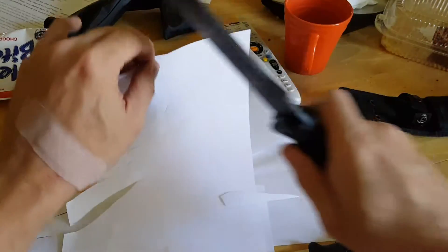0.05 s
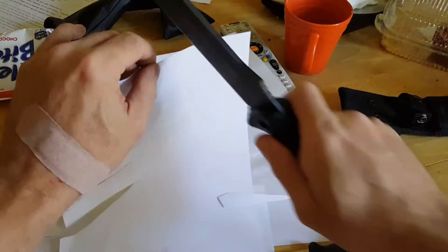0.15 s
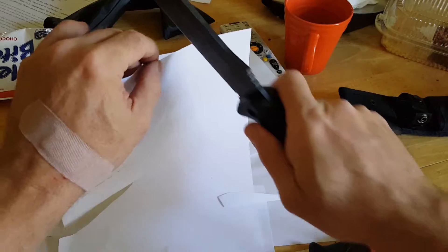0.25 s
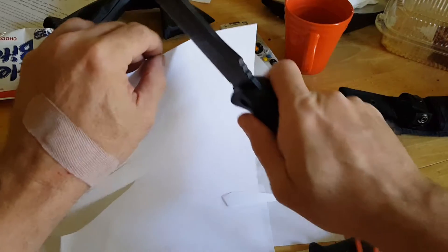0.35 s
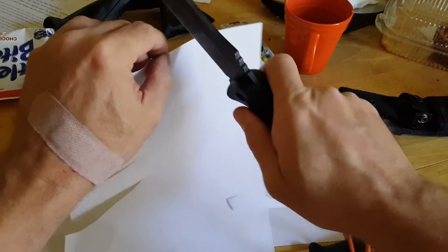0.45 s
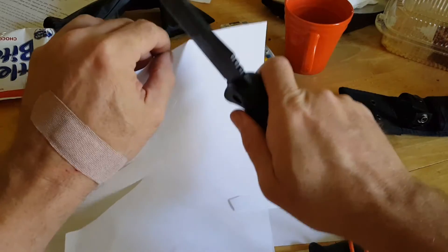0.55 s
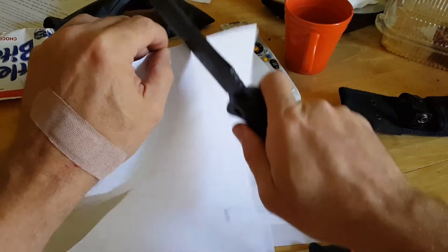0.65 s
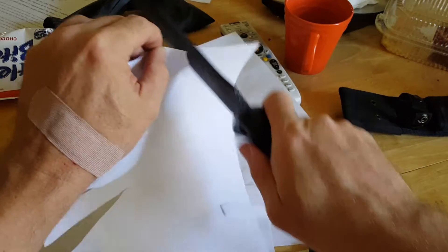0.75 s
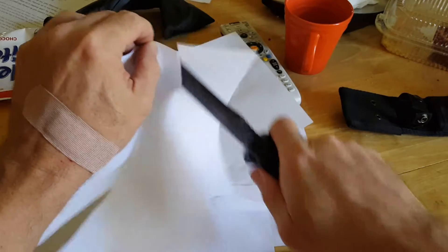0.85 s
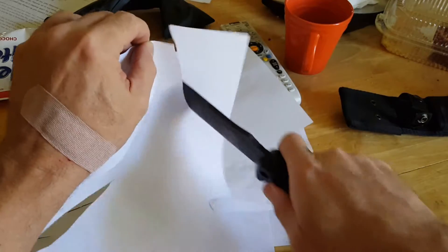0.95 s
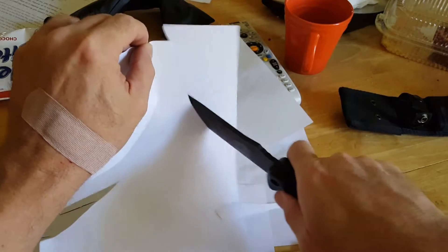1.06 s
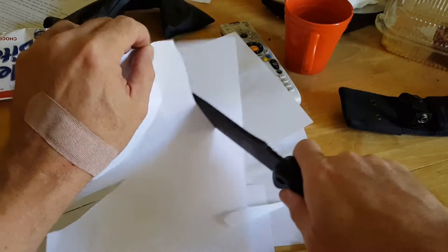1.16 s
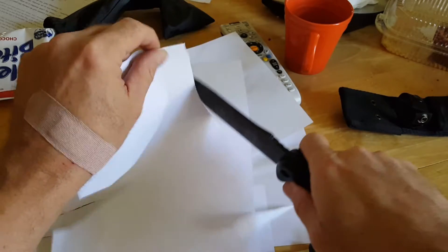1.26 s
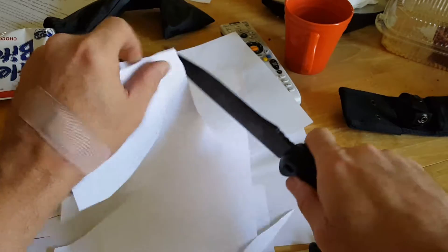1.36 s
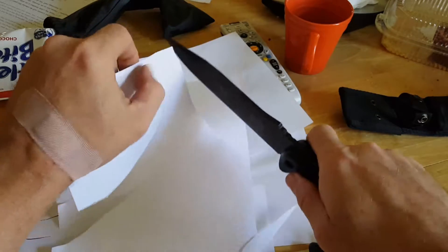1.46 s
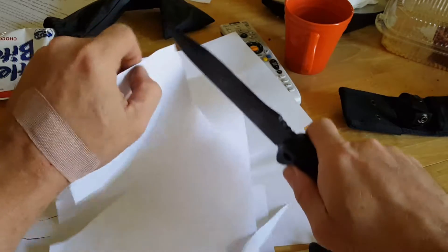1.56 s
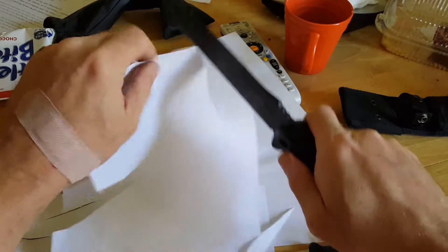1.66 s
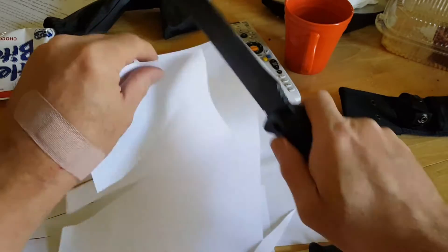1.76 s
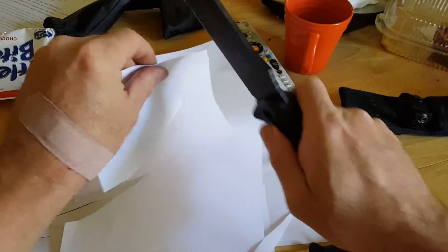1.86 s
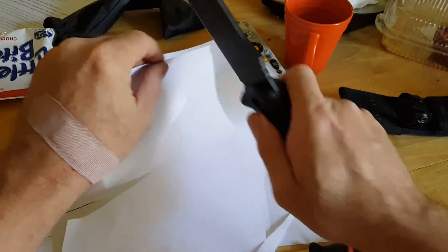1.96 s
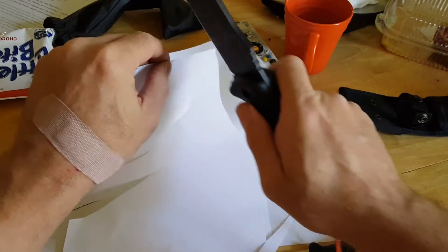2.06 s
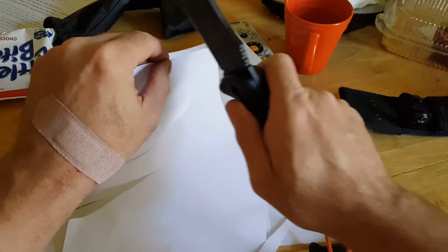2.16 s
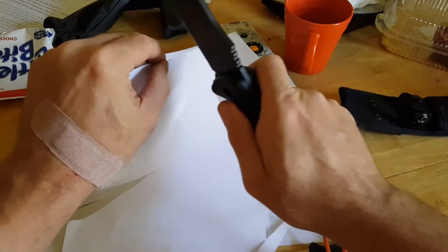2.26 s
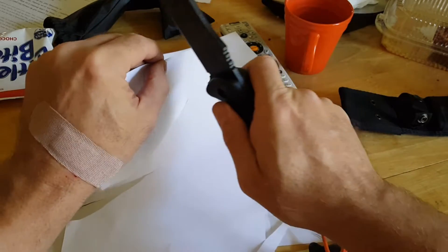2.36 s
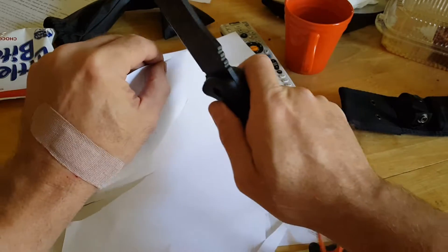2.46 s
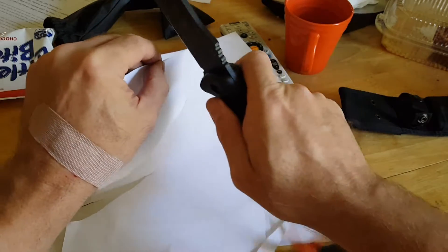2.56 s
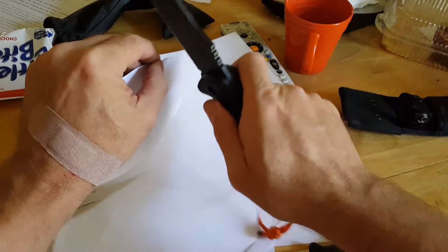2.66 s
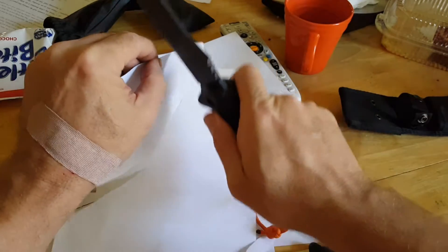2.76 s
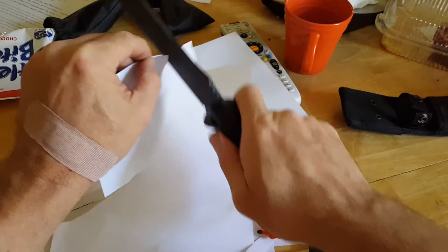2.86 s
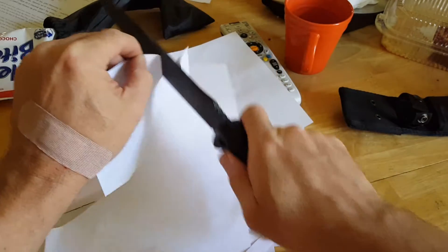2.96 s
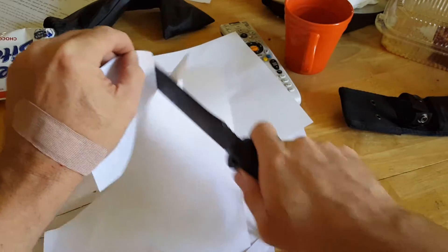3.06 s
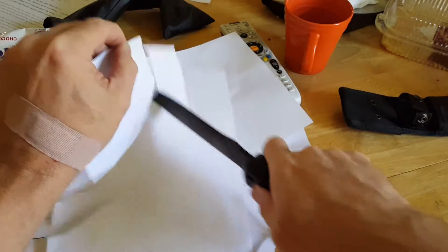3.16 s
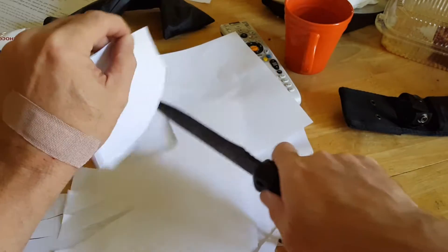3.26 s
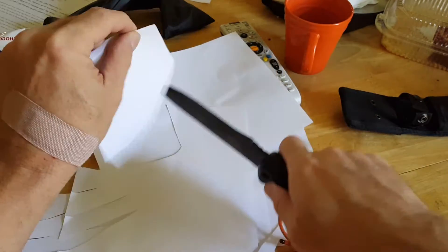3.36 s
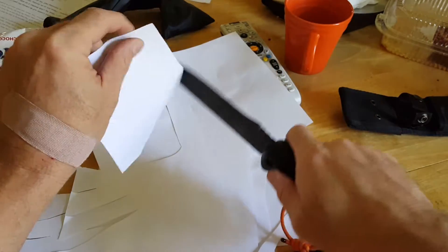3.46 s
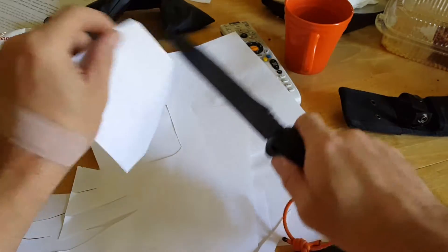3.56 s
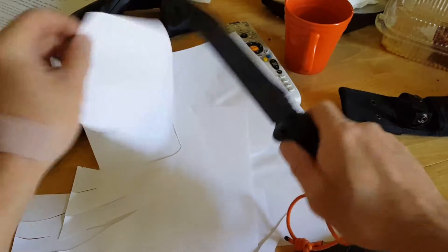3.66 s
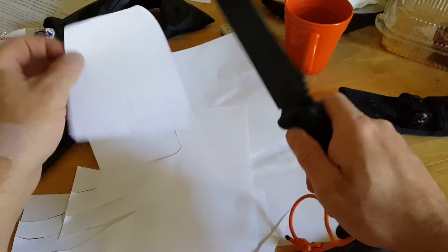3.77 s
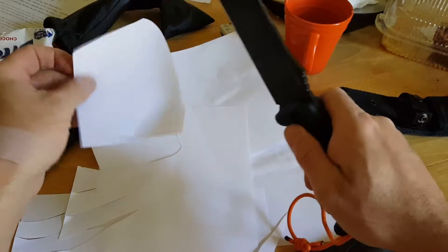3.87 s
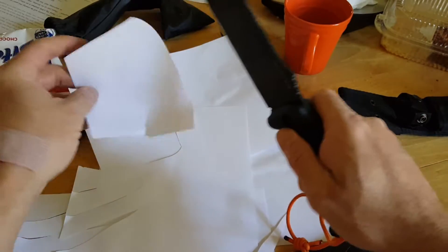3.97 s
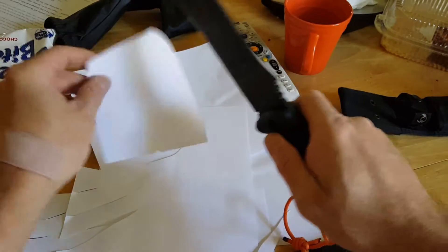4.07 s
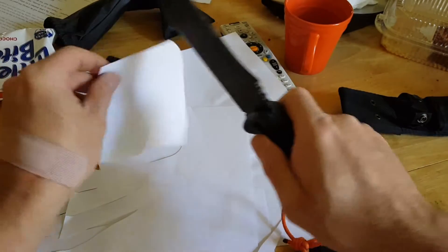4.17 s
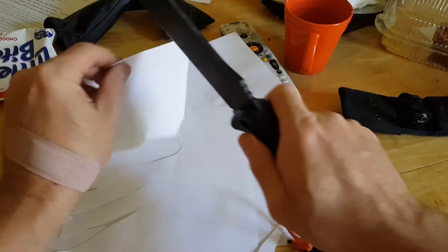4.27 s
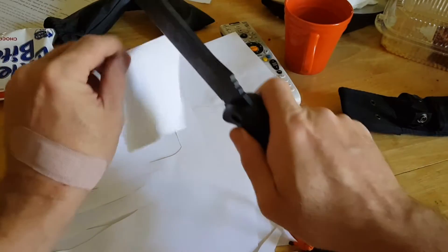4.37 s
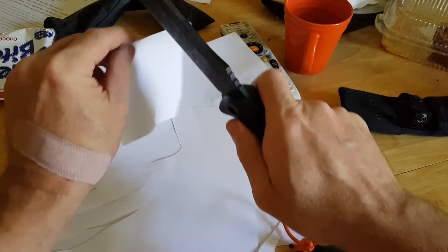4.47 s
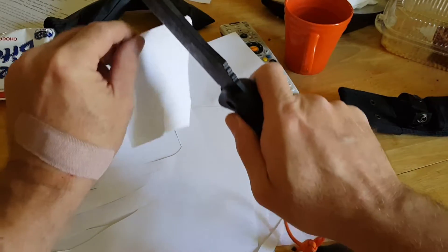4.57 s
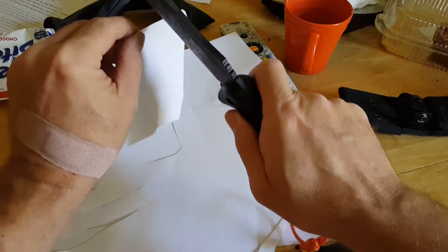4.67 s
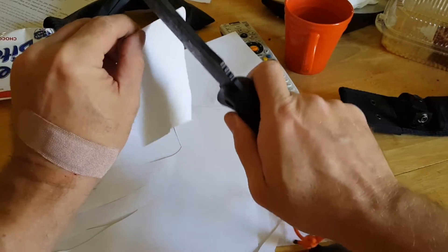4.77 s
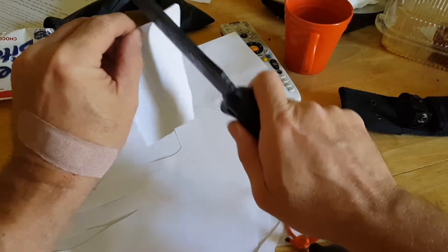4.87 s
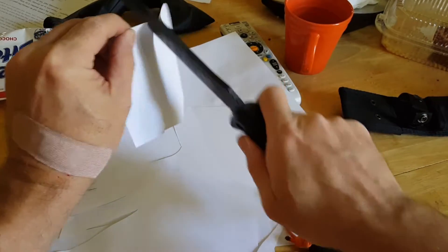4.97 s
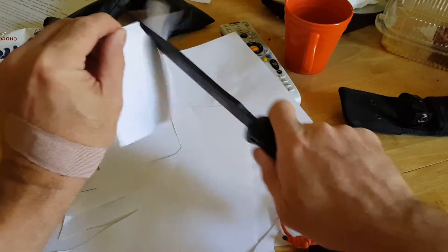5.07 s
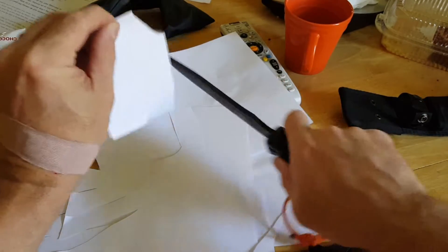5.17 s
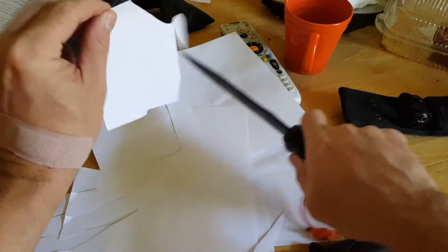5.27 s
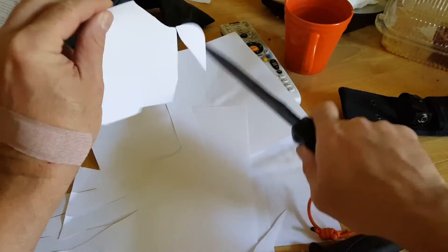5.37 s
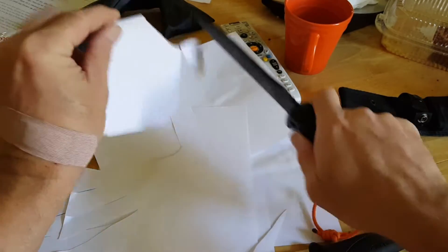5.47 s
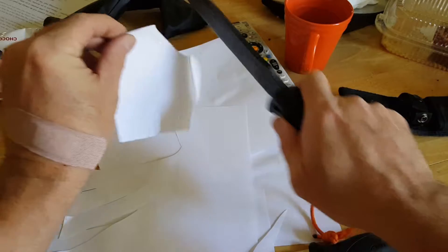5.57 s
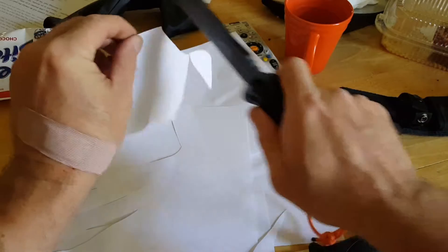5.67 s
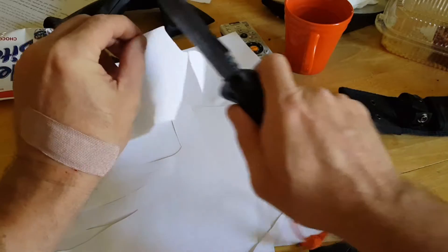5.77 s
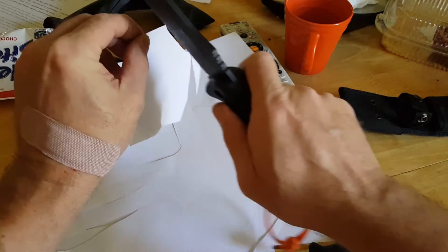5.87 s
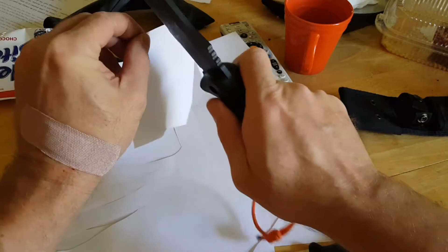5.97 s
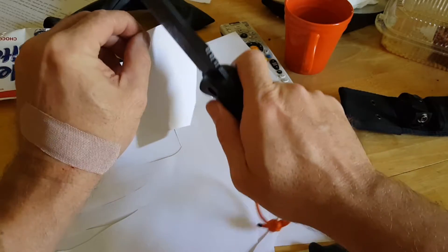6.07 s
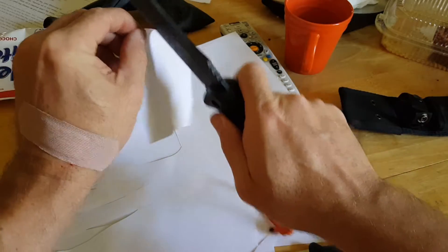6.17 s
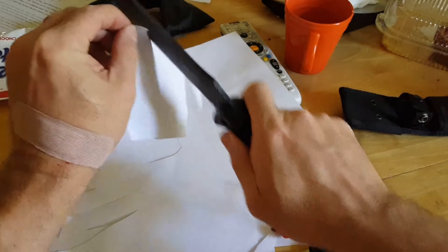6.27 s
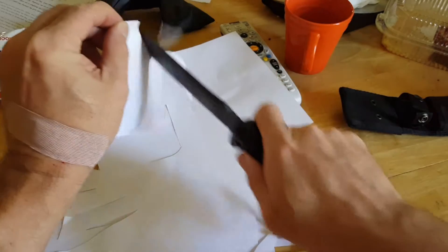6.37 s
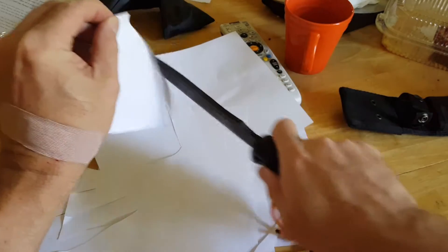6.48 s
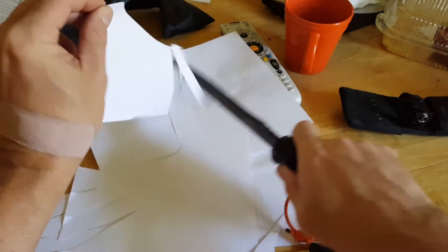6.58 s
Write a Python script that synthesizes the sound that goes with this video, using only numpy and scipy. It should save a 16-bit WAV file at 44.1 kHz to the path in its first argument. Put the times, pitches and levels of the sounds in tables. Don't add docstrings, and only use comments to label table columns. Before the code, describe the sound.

In a small quiet room, very close to a stereo microphone, a knife slices a held sheet of paper twice with dense crackling zips. Fingers then shift the paper, with rustles and two sharp pops, before two quicker, tighter cuts through a smaller piece. Soft wrist knocks on the table, faint appliance drone and hiss lie underneath.

```python
import sys
import numpy as np
from scipy import signal
from scipy.fft import rfft, irfft, next_fast_len
from scipy.io import wavfile
from scipy.ndimage import uniform_filter1d, map_coordinates

SR = 44100
rng = np.random.default_rng(int(sys.argv[2]) if len(sys.argv) > 2 else 0)


def magnitude_from_level(level_db):
    exponent = np.asarray(level_db, float) / 20
    return 10 ** exponent


def wrap_up_sound(samples):
    columns = np.atleast_2d(samples).T
    tamed = np.clip(columns, -1, 1)
    steps = np.round(tamed * 32767).astype(np.int16)
    wavfile.write(sys.argv[1], SR, steps)


N = 291693


def unit(x):
    return x / np.sqrt(np.mean(x ** 2) + 1e-20)


def along(points, hz):
    f, v = np.transpose(points)
    return np.interp(np.log(hz + 1), np.log(f + 1), v)


def wobble(rate):
    knots = rng.standard_normal(int(N * rate / SR) + 4)
    return map_coordinates(knots, [np.arange(N) * rate / SR])


def filtered(x, response):
    m = next_fast_len(N + 8192)
    return irfft(rfft(x, m) * response(np.fft.rfftfreq(m, 1 / SR)), m)[..., :N]


def colour(points):
    return lambda hz: magnitude_from_level(along(points, hz))


def modes(rows):
    def response(f):
        total = 0
        for k, (centre, width, db) in enumerate(rows):
            resonance = 1j * f * width / (centre * centre - f * f + 1j * f * width)
            total = total + (-1) ** k * magnitude_from_level(db) * resonance
        return total
    return response


def steep(rows):
    lowest = rows[0][0]
    return lambda hz: modes(rows)(hz) * (1j * hz / lowest) / (1 + 1j * hz / lowest)


# (frequency [Hz], level [dB per Hz])
MURMUR = [(15, -27.5), (40, -14), (80, -15), (150, -11), (300, -12), (600, -10), (900, -16), (2000, -20),
          (4000, -29), (7500, -36.5), (9500, -39), (15900, -33)]
# (frequency [Hz], width [Hz], level [dB])
APPLIANCES = [(58, 6.2, -7.5), (116.1, 6.2, 2), (190, 33, -7), (231.4, 5, 0.5), (328.3, 22, -11.5),
              (437, 6.7, -7.5)]


def hush():
    murmur = unit(filtered(rng.standard_normal((2, N)), colour(MURMUR)))
    drone = unit(filtered(rng.standard_normal((2, N)), modes(APPLIANCES)))
    level_db = -60.5 + 0.62 * wobble(3.9)
    return magnitude_from_level(level_db) * (magnitude_from_level(-6.0) * murmur + magnitude_from_level(-1.5) * drone)


def crackle(spread_db, clump_db, patch_db):
    snap_db = spread_db * np.minimum(rng.exponential(size=(2, N)), 5.5)
    clumps = 0.98 * wobble(40) + wobble(220) + 1.3 * wobble(700)
    size = magnitude_from_level(snap_db + clump_db * clumps)
    z = signal.stft(size * rng.standard_normal((2, N)), nperseg=256)[2]
    patches = uniform_filter1d(rng.standard_normal(z.shape[1:]), size=4, axis=0)
    patches = unit(uniform_filter1d(patches, size=14, axis=1))
    return unit(signal.istft(z * magnitude_from_level(patch_db * patches), nperseg=256)[1][:, :N])


# (time [s], rise [ms per 10 dB], fall [ms per 10 dB], scrape level [dB], hiss relative to scrape [dB])
DRAGS = [(0.001, 10, 80, -57, -2.5), (.195, 12, 98, -61.5, 1), (.51, 128, 101, -63, -2),
         (1.288, 16.5, 8, -49, -2), (1.335, 12.5, 264, -50, -1.5), (1.59, 18, 280, -57.5, -0.5),
         (1.776, 23, 141, -54.5, -2), (1.885, 120, 48.5, -59.5, 3), (2.05, 103.5, 53, -56, -1.5),
         (2.2, 105, 219, -66.5, -13), (2.735, 25.5, 131, -58.5, -0.5), (3.31, 21.5, 128, -59, -0.5),
         (3.495, 65, 19.5, -62, 2), (3.654, 130, 120, -64.5, 4.5), (3.79, 120, 33, -60.5, 1.5),
         (3.93, 67, 51.5, -59, 3.5), (3.968, 15, 6, -52.5, -4.5), (4.11, 71.5, 73, -55, 3),
         (4.295, 63, 29, -70.5, 9.5), (4.462, 47, 43, -69.5, 7.5), (4.608, 53, 63, -61, 0.5),
         (5.4, 146, 73, -68.5, 5.5), (5.55, 99, 128.5, -74.5, 10), (5.75, 40, 100, -80, 4.5)]
# (frequency [Hz], level [dB per Hz])
SCRAPE = [(300, -48), (700, 0.5), (1100, 4), (2000, 5.5), (3500, 1), (6000, -38)]
# (frequency [Hz], width [Hz], level [dB])
FLEX = [(180, 86, -1.5), (335, 214, 0.5), (516, 170, -2.5)]
# (frequency [Hz], level [dB per Hz])
FIZZ = [(1500, -27.5), (3500, -2), (5000, -2.5), (6500, -3.5), (7800, -5), (8600, -14), (9800, -21.5),
        (12000, -12.5), (14500, -15), (16000, -15)]


def rustle():
    grains = crackle(spread_db=2, clump_db=2.0, patch_db=1)
    scrape = unit(filtered(grains, colour(SCRAPE)))
    flex = unit(filtered(grains, steep(FLEX)))
    hiss = unit(filtered(grains[::-1], colour(FIZZ)))
    t = np.arange(N) / SR
    drag = airy = np.full(N, magnitude_from_level(-80.5))
    for s, rise_ms, fall_ms, db, hiss_db in DRAGS:
        distance = 1000 * np.maximum((s - t) / max(rise_ms, 2), (t - s) / max(fall_ms, 2))
        swell = magnitude_from_level(db - 10 * distance ** 1.3)
        drag = np.hypot(drag, swell)
        airy = np.hypot(airy, magnitude_from_level(hiss_db) * swell)
    return drag * (magnitude_from_level(1.5) * scrape + magnitude_from_level(-7.5) * flex) + airy * hiss


# (time [s], peak level [dB], crispness relative to
# peak [dB], note of the flap [Hz], t60 [s])
POPS = [(0.086, -39, -16.5, 1760, .026), (.672, -28, -23.5, 1000, .035), (1.302, -15.5, -11, 1099, 0.081),
        (1.372, -41.5, 1.5, 1440, 0.034), (1.412, -38, -23, 2050, .027), (1.431, -28, -21.5, 840, 0.0096),
        (1.567, -26.5, -12.5, 1895, .08), (1.667, -27, -17, 1050, 0.11), (2.39, -39, -38, 830, 0.054),
        (2.868, -27, -9.5, 850, 0.06), (3.265, -28, -10.5, 1660, .037), (3.45, -41, -6, 926, 0.038),
        (3.768, -50.5, -2, 1714, 0.02), (3.976, -15.5, -15, 1790, 0.034), (4.001, -22.5, 1, 3430, .035),
        (4.007, -10.5, -15.5, 1800, 0.055), (5.163, -18, -15.5, 3100, 0.039), (5.511, -50.5, 3, 3030, .025)]
# (time [s], peak level [dB], crispness relative to peak [dB], note of the flap [Hz], t60 [s])
SCUFFS = [(0.159, -33.5, 3, 1380, 0.063), (0.169, -30, -5.5, 1610, 0.1), (0.179, -34, -17, 1110, .035),
          (1.757, -42, 4, 840, 0.074), (1.848, -38, -5.5, 1100, 0.078), (2.725, -39, -5, 1480, 0.11),
          (3.458, -42, -18, 875, 0.021), (3.493, -39.5, -19, 1040, .047), (3.658, -46.5, -5, 1630, 0.058),
          (4.017, -25.5, -10, 970, .044), (4.029, -28.5, -20.5, 1220, .035), (4.107, -29, -22, 1060, 0.04),
          (4.118, -35.5, -17, 1300, .04), (4.151, -36.5, -12, 1050, .031), (4.275, -40.5, -18, 1470, .034),
          (5.356, -42, -16, 1100, 0.056), (5.538, -45.5, -16, 960, 0.038)]
# (frequency [Hz], level [dB per Hz])
CRISP = [(2000, -21.5), (3500, 1.5), (5000, -4), (8000, -10), (9800, -25), (16000, -24)]


def pops(rows, crack_db, rise_s, sharpness):
    out, t = np.zeros((2, N)), np.arange(SR // 5) / SR
    hz_grid = np.fft.rfftfreq(len(t), 1 / SR)
    noise = rfft(rng.standard_normal((len(rows), 2, len(t))))
    bursts = irfft(noise)
    flexes = unit(irfft(noise * steep(FLEX)(hz_grid)))
    crisps = unit(irfft(noise * colour(CRISP)(hz_grid)))
    for (s, db, crisp_db, hz, t60), burst, flex, crisp in zip(rows, bursts, flexes, crisps):
        shiver = magnitude_from_level(-60 * t / max(t60, .006))
        crack = magnitude_from_level(crack_db - 60 * t / 0.00883)
        fade = np.minimum(t / rise_s, 1) * (shiver + crack)
        peak = signal.iirpeak(hz, sharpness, SR)
        flap = signal.lfilter(*peak, signal.lfilter(*peak, fade * burst))
        flap = magnitude_from_level(4.5) * flap / np.abs(flap[0]).max()
        thud_db = -24 - .6 * (db + 33)
        sheet = fade * (magnitude_from_level(thud_db + 13.5) * flex + magnitude_from_level(crisp_db + 3) * crisp)
        start = round((s + .001) * SR)
        out[:, start:start + len(t)] += magnitude_from_level(db - 9) * (flap + sheet)
    return out


# (time [s], level [dB], frequency [Hz], t60
# [s])
KNOCKS = [(0.181, -56, 298, .05), (1.164, -38.5, 76.5, 0.081), (1.305, -41.5, 176, 0.19),
          (1.668, -39, 308, 0.054), (2.391, -59, 298, 0.04), (2.872, -45, 300, 0.079), (3.2, -56, 60, .1),
          (3.266, -33.5, 296, 0.042), (4.9, -52, 35, 0.2), (5.163, -35, 248, 0.06),
          (5.216, -48.5, 427, 0.25), (5.54, -43, 223, 0.065), (6.492, -34, 305, 0.13)]


def bumps():
    out, t = np.zeros(N), np.arange(SR // 10) / SR
    onset = 1 - np.exp(-t / 0.0047)
    for s, db, hz, t60 in KNOCKS:
        out[round(s * SR):][:len(t)] += magnitude_from_level(db - 60 * t / t60) * onset * np.sin(2 * np.pi * hz * t)
    return out


def curves(rows, fade):
    s, *cols = np.transpose(rows)
    t = np.arange(N) / SR
    gate = np.clip(np.minimum(t - s[0], s[-1] + .005 + fade - t) / fade, 0, 1)
    return gate, [np.interp(t, s, c) for c in cols]


# (time [s], bite level [dB], slack of the paper [dB], tension of the slit edges [dB])
SHEET_CUTS = [
    [(0.673, -60, 18.5, -1), (0.687, -41.5, 4.5, 2), (0.743, -37.5, 8.5, 1), (0.791, -42.5, 4, 7.5),
     (0.949, -36.5, 8.5, 3.5), (0.969, -37, 2, 6.5), (1.005, -40.5, 12.5, 11), (1.139, -37.5, 4, 6.5),
     (1.164, -39.5, 0.5, 2)],
    [(2.868, -52.5, 8, 4), (2.874, -41, 7, 0), (2.914, -39, -7.5, -1), (2.982, -37.5, -1.5, -2),
     (3.018, -35, -5, -5.5), (3.16, -31.5, -2, 3), (3.185, -30.5, -9, -10)],
]
# (time [s], bite level [dB], slack of the paper [dB], tension of the slit edges [dB])
PIECE_CUTS = [
    [(4.91, -57.5, 15, 3.5), (4.922, -45, 2, 5), (4.972, -40, -16, 1), (5.002, -40.5, -1.5, 4.5),
     (5.062, -39.5, 1, 3.5), (5.126, -37.5, -2.5, -4), (5.176, -35, -2.5, -5.5), (5.19, -38.5, 1, -0.5)],
    [(6.209, -64.5, 3, 5.5), (6.221, -45, -1.5, -3), (6.279, -42, -8, -2), (6.287, -37, -16, -18),
     (6.325, -37, -16.5, -9.5), (6.359, -43, -4.5, -5), (6.409, -38.5, -5, -0.5), (6.459, -40, 8.5, 4),
     (6.52, -35, -3.5, 0.5)],
]
# (cut-off corner [dB], slow flexing [dB], blade sliding clear [dB],
# slide [s], paper in the slide [dB])
HELD = [(-2, -14.5, -57, .03, -2.5), (1, -18, -44, 0.085, -6.5), (0, -17.5, -48, 0.027, -5.5),
        (-0.5, -13.5, -42.5, 0.037, -5.5)]
# (rasp in the edges [dB], finest fibre hiss [dB])
STEEL_SIDE = [(-18.5, -2.5), (-7.5, -3), (-5, 0), (-13, 0.5)]
# (time [s], surge [dB], dies in [ms])
CATCHES = [(.812, 3.5, 40), (.921, 5, 45), (1.088, 5.5, 24), (3.065, 2, 30), (4.973, 5, 6), (4.987, 5, 4),
           (5.003, 4, 6), (5.017, 1.5, 5), (5.031, 4, 4), (5.053, 1.5, 6), (5.072, 4, 8), (6.245, 3.5, 20),
           (6.548, 4.5, 10)]
# (frequency [Hz], width [Hz], level [dB])
BODY = [(840, 375, 5), (1090, 474, 8), (1300, 464, 2)]
# (frequency [Hz], width [Hz], level [dB])
EDGES = [(1830, 670, 15.1), (2680, 1120, 6.1)]
# (frequency [Hz], width [Hz], level [dB])
CORNER = [(2718, 130, -2.5), (3100, 270, 1), (3717, 240, -5.5)]
# (frequency [Hz], width [Hz], level [dB])
RIDGE = [(1857, 140, 0)]
# (frequency [Hz], width [Hz], level [dB])
BLADE = [(7616, 120, -0.5), (6830, 200, -12.5)]


def cuts():
    snaps = crackle(spread_db=3.5, clump_db=0.0, patch_db=2.3)
    others = snaps[::-1] * [[1], [-1]]
    body, edges, flex, ridge = [unit(filtered(snaps, steep(part))) for part in (BODY, EDGES, FLEX, RIDGE)]
    corner = unit(filtered(others, steep(CORNER)))
    steel = unit(filtered(others, modes(BLADE)))
    fizz = unit(filtered(snaps, colour(FIZZ)))
    air = filtered(fizz, lambda hz: hz > 8760)
    loose = body + magnitude_from_level(4.5) * edges + magnitude_from_level(-2.5) * flex
    out, t = np.zeros((2, N)), np.arange(N) / SR
    for rows, held, (ridge_db, air_db) in zip(SHEET_CUTS + PIECE_CUTS, HELD, STEEL_SIDE):
        corner_db, flex_db, slide_db, slide_s, loose_db = held
        gate, (db, slack_db, edge_db) = curves(rows, fade=.002)
        start, end = rows[0][0], rows[-1][0]
        along_slit = np.clip((t - start) / (end - start), 0, 1)

        sheet = magnitude_from_level(-1.2) * body + magnitude_from_level(flex_db + 10 * along_slit ** 6.2) * flex
        slit = edges + magnitude_from_level(corner_db + 1.5 * (.5 - along_slit)) * corner
        slit = magnitude_from_level(edge_db + 0.1) * (slit + magnitude_from_level(ridge_db + 0.64 * edge_db) * ridge)
        song = magnitude_from_level(np.minimum(8.2 * (db + 33.5), 0) - 7.0) * steel
        fibres = fizz + (magnitude_from_level(air_db - 0.34 * (db + 38)) - 1) * air
        out += gate * magnitude_from_level(db) * (magnitude_from_level(slack_db) * sheet + slit + magnitude_from_level(3.5) * (fibres + song))

        after = np.maximum(t - end, 0)
        fall_db = 41.5 * after + 249.5 * np.maximum(after - slide_s, 0)
        slide = magnitude_from_level(slide_db - fall_db) * (fizz + magnitude_from_level(loose_db) * loose)
        out += (after > 0) * (1 - gate) * slide
    surge_db = np.zeros(N)
    for s, db, dies_ms in CATCHES:
        surge_db += db * (t > s) * np.exp(-1000 * np.abs(t - s) / max(dies_ms, 2))
    return magnitude_from_level(surge_db) * out


# (frequency [Hz], t60 [s])
ROOM = [(200, 0.41), (1000, 0.26), (4000, 0.33), (12000, 0.09)]


def room(x):
    hz, t, z = signal.stft(rng.standard_normal((2, SR // 2)), SR, nperseg=256)
    tail = signal.istft(z * magnitude_from_level(-60 * t / along(ROOM, hz)[:, None]), SR, nperseg=256)[1]
    delayed = np.pad(x, ((0, 0), (200, 0)))
    return signal.fftconvolve(delayed, tail / np.linalg.norm(tail[0]), axes=1)[:, :N]


# (frequency [Hz], correlation [0-1])
NEAR_ALIKE = [(300, .97), (700, .95), (1400, .82), (2800, .62), (5600, .45), (10000, .25)]
# (frequency [Hz], correlation [0-1])
FAR_ALIKE = [(40, 0.79), (150, 1), (500, 0.63), (1500, 0.27), (5000, 0.067)]
# (frequency [Hz], phase [rad])
LEAD = [(0, 0), (1800, 1.7), (2800, 2), (4500, 4), (7500, 6.5), (16200, 14.5)]


def ports(pair, alike, lead_share):
    def blend(hz):
        turn = np.arccos(np.clip(along(alike, hz), 0, 1)) / 2
        return np.array([np.cos(turn), np.sin(turn)])

    def lead(hz):
        phase = lead_share * np.interp(hz, *np.transpose(LEAD)) / 2
        return np.exp(1j * phase * np.array([[1], [-1]]))

    a, b = filtered(pair, blend)
    return filtered(np.array([a + b, a - b]), lead)


# (frequency [Hz], level [dB])
CASING = [(60, -31), (170, -1), (450, -1.5), (560, -3.5), (650, -7.5), (730, 0.5)]
# (frequency [Hz], left minus right [dB])
LEAN = [(200, -1), (700, 3.5), (2500, .5), (6000, 1.5), (9000, 8), (13000, -1.5)]


def camera_body(heard):
    sides = np.array([[.5], [-.5]])
    return filtered(heard, lambda hz: magnitude_from_level(along(CASING, hz) + along(LEAN, hz) * sides))


def scene():
    background = ports(hush(), FAR_ALIKE, lead_share=0.96) * magnitude_from_level([[.4], [-.4]])
    paper = rustle()
    paper += pops(POPS, crack_db=3.5, rise_s=0.0003, sharpness=0.47)
    paper += pops(SCUFFS, crack_db=-9, rise_s=0.0035, sharpness=0.82)
    paper += cuts()
    heard = ports(paper + magnitude_from_level(-10) * room(paper), NEAR_ALIKE, lead_share=0.87)
    return camera_body(heard) + background + bumps()


def band_limit(x):
    return signal.sosfilt(signal.butter(12, 16620, fs=SR, output="sos"), x)


def record(dry):
    limited = filtered(dry, lambda hz: hz < 15950)
    return band_limit(limited - .0005)


dry = scene()
out = record(dry)
wrap_up_sound(out)
```